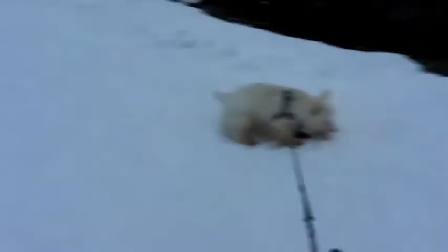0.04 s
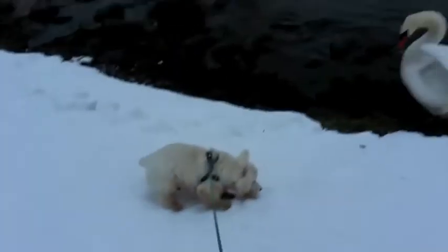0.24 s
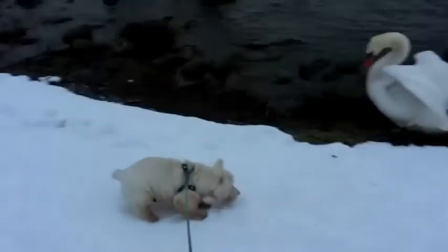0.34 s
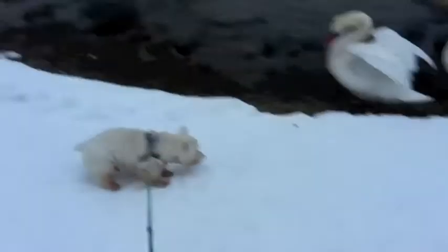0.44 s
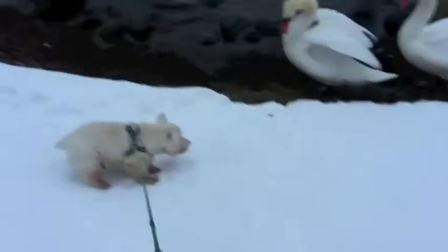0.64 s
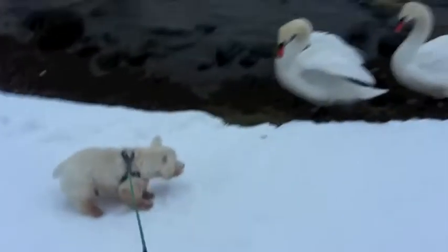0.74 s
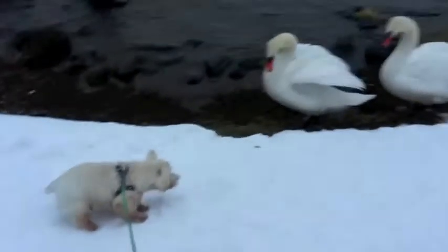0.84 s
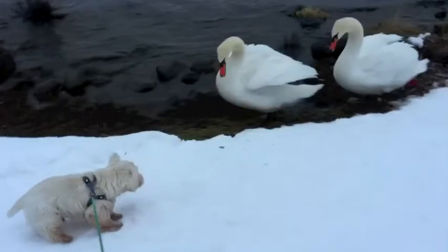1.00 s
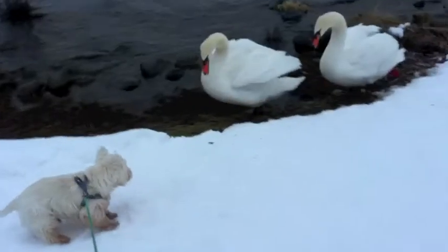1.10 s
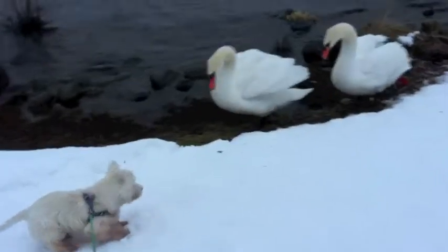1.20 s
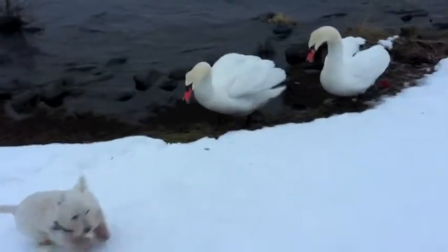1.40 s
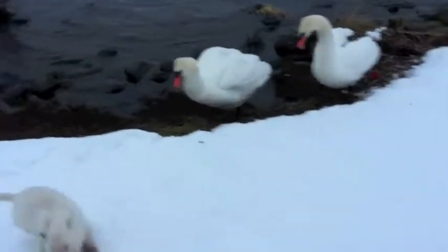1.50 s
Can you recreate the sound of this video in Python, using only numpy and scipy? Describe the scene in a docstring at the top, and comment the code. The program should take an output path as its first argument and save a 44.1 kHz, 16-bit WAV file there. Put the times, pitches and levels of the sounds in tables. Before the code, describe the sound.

Close footsteps in snow, outdoors beside a faintly washing river. The first lands with muffled thumps as a swan-like hiss briefly rises and dies away; the second is softer, crackling and creaking, with clothing rustle and one bright tick.

```python
"""Dull slips of snow packing under a boot sound close by, over the faint wash of a river.
Among them a short hiss, probably a swan's, swells and fades: turbulent air with moving resonances.
After a lull comes a lighter step: the crust fractures in crackles, the snow creaks under the load
and clothing swishes by friction. One sharp tick may be the clip of a small dog's lead."""
import sys
import numpy as np
from scipy import signal
from scipy.fft import rfft, irfft
from scipy.io import wavfile
from scipy.ndimage import map_coordinates

SR = 44100
rng = np.random.default_rng(int(sys.argv[2]) if len(sys.argv) > 2 else 0)


def int16_out(signal):
    """Quantize to a 16-bit WAV file."""
    q = np.round(np.clip(np.atleast_2d(signal).T, -1, 1) * 32767)
    wavfile.write(sys.argv[1], SR, q.astype(np.int16))


N = 68355
T = np.arange(N) / SR

# wash of the river (time [s], level [dB]) and its spectrum (frequency [Hz], gain [dB])
RIVER_LEVEL = [(0, -57), (.3, -61), (.8, -62.5), (1.55, -60.5)]
RIVER_SPECTRUM = [(30, -13), (70, -16), (150, -3.5), (400, -5.5), (800, -5), (2200, -8.5), (4200, -16),
                  (7000, -17), (10000, -19), (16000, -23)]
# swish of clothing (time [s], level [dB])
SWISH_LEVEL = [(.86, -70.5), (.93, -65.5), (1.0, -67), (1.12, -62), (1.4, -57), (1.55, -50)]
# its resonances (frequency [Hz], width [Hz], gain [dB]) and their glide (time [s], pitch [ratio])
CLOTH_RESONANCES = [(3050, 590, -1), (6600, 570, -4), (10000, 1700, -13.5)]
CLOTH_GLIDE = [(1.15, 0.91), (1.43, 1.08), (1.55, .99)]
# crunch of each step, and of weight settling on the second (time [s], level [dB])
FIRST_STEP_LEVEL = [(.336, -82), (.340, -43), (.352, -53), (.395, -46), (.435, -59), (.49, -51), (.55, -61),
                    (.605, -50), (.635, -71), (.72, -67.5)]
SECOND_STEP_LEVEL = [(.908, -84), (.917, -51.5), (.96, -57.5), (1.06, -55), (1.11, -50), (1.25, -57.5),
                     (1.345, -50.5), (1.405, -55), (1.55, -49)]
SETTLING_LEVEL = [(1.2, -66.5), (1.29, -55), (1.39, -56), (1.41, -62), (1.47, -49.5), (1.55, -61.5)]
# spectra of these three (frequency [Hz], gain [dB])
FIRST_STEP_SPECTRUM = [(250, -21), (500, 7), (950, 7.5), (2300, -1), (3100, -13.5), (5300, -4.5),
                       (8000, -16.5), (16000, -16)]
SECOND_STEP_SPECTRUM = [(240, 1.5), (320, -0.5), (750, -1.5), (1200, -1), (1900, -8.5), (3200, -10),
                        (4400, -17), (8000, -23.5), (16000, -40)]
SETTLING_SPECTRUM = [(200, -9), (450, -2.5), (620, 1), (900, -10.5), (2000, -29.5)]
# tone of the settling snow (time [s], frequency [Hz])
CREAK_PITCH = [(1.27, 330), (1.39, 466.4), (1.47, 506.5), (1.55, 565)]
# single cracks of the crust (time [s], peak [dB], frequency [Hz], decay [s])
CRUST_CRACKS = [(0.3381, -39, 4370, .0014), (0.914, -40, 824, 0.003), (0.941, -42, 5513, 0.0012),
                (0.9816, -38.5, 1650, 0.002), (1.046, -41.5, 1360, 0.0024), (1.0806, -34, 1310, 0.0018),
                (1.108, -42.5, 1270, 0.0061), (1.2, -43, 1620, 0.0024), (1.343, -41, 1320, 0.0043),
                (1.455, -43.5, 1480, 0.00098)]
# hollow knocks in the crust (time [s], peak [dB], frequency [Hz])
CRUST_KNOCKS = [(.6685, -40, 713), (1.082, -42.5, 303), (1.320, -40.5, 385), (1.382, -46, 483),
                (1.458, -37, 546)]
# bright rush of the hiss (time [s], level [dB]) and its spectrum (frequency [Hz], gain [dB])
RUSH_LEVEL = [(.33, -78), (.39, -61), (.435, -52.5), (.472, -42.5), (.515, -40.5), (.545, -56), (.62, -56),
              (.76, -67)]
RUSH_SPECTRUM = [(710, -35), (1200, -19), (1500, -5.5), (2380, -2.5), (3360, -3.5), (3780, 2.5), (4200, -2),
                 (5800, -4.5), (8170, -8), (9210, -16), (12500, -11.5), (16000, -28)]
# hollow part of the hiss (time [s], level [dB]) and the throat's glide (time [s], pitch [ratio])
HOLLOW_LEVEL = [(.35, -59.5), (.395, -49), (.435, -53.5), (.485, -53), (.53, -43.5), (.595, -48.5),
                (.622, -57), (.73, -58), (.79, -66.5), (.86, -74)]
THROAT_GLIDE = [(.36, .78), (.41, .94), (.45, 1.07), (.525, .92), (.59, .96), (.68, 1.04)]
# its gliding and its steady resonances (frequency [Hz], width [Hz], gain [dB])
THROAT_RESONANCES = [(1990, 300, -2.5), (2646, 370, 3), (4010, 190, -3.5), (4700, 300, -3.5)]
SIBILANCE, SIBILANCE_DB = [(7050, 180, 0), (11100, 1600, -13.5)], -14
# snow giving way under the boot (time [s], peak before the bass cut [dB], frequency [Hz])
SNOW_SLIPS = [(0.071, -44.5, 125), (.167, -46, 170), (0.2315, -32, 222), (0.245, -32, 167),
              (.257, -32, 189), (0.2679, -33.5, 318), (0.283, -30, 182), (0.322, -32.5, 167),
              (0.385, -28, 218), (0.393, -29.5, 180), (0.403, -27, 338), (.460, -35, 220),
              (0.4707, -15, 190), (0.487, -27, 240), (0.488, -34.5, 620), (.546, -24.5, 237),
              (0.5638, -22, 282), (.570, -28, 213), (.579, -28.5, 201), (0.5829, -21, 434),
              (.603, -28, 230), (0.655, -34.5, 182), (.670, -27.5, 227), (0.681, -36, 161),
              (.709, -36, 244), (1.002, -46, 179), (1.308, -46, 135)]
# rumble of smaller slips (time [s], level [dB]) and its spectrum (frequency [Hz], gain [dB])
RUMBLE_LEVEL = [(0, -62.5), (.115, -66.5), (.165, -52.5), (.205, -56.5), (.24, -49.5), (.41, -44),
                (.445, -46.5), (.48, -28), (.525, -40.5), (.6, -38.5), (.632, -53.5), (.69, -50.5),
                (.745, -67.5), (.87, -68), (.97, -54.5), (1.04, -71), (1.23, -65.5), (1.3, -55),
                (1.55, -55)]
RUMBLE_SPECTRUM = [(25, -24.5), (60, -22.5), (95, -8), (130, 3), (210, -1), (330, -10), (550, -15.5),
                   (900, -27), (2000, -61)]


def from_db(db):
    """Amplitude grows tenfold for every 20 dB."""
    return 10 ** (np.asarray(db) / 20)


def rms_one(x):
    """Normalisation to unit rms."""
    return x / np.sqrt(np.mean(x ** 2) + 1e-20)


def level(rows):
    """Amplitude envelope, interpolated in decibels and silent outside its span."""
    return from_db(np.interp(T, *np.transpose(rows), left=-140, right=-140))


def coloured(x, spectrum):
    """Spectral shaping, falling 12 dB per octave below the lowest point; unit rms."""
    hz, db = np.transpose(spectrum)
    f = np.maximum(np.arange(N // 2 + 1) * SR / N, 1)
    gain = from_db(np.interp(np.log(f), np.log(hz), db)) * np.minimum(f / hz[0], 1) ** 2
    return rms_one(irfft(rfft(x) * gain, N))


def resonate(x, hz, width_hz):
    """A damped two-pole resonator with unit peak gain."""
    r = np.exp(-np.pi * width_hz / SR)
    feedback = [1, -2 * r * np.cos(2 * np.pi * hz / SR), r * r]
    return signal.lfilter(np.array([1, 0, -1]) * (1 - r * r) / 2, feedback, x)


def cut(x, hz, kind, order=2):
    """Maximally flat low- or high-pass filtering."""
    return signal.sosfilt(signal.butter(order, hz, kind, fs=SR, output="sos"), x)


def resonant_noise(resonances):
    """Random excitation of parallel resonators; unit rms."""
    bands = (from_db(db) * resonate(rng.standard_normal(N), hz, width) for hz, width, db in resonances)
    return rms_one(sum(bands))


def glide(x, pitch_curve):
    """Resampling at a changing rate scales all frequencies by the same ratio."""
    ratio = np.interp(T, *np.transpose(pitch_curve))
    return map_coordinates(x, [np.cumsum(ratio)], order=3, mode="wrap")


def add(out, s, db, sound):
    """Superposition of a transient at a given time and peak level."""
    i = int(s * SR)
    out[i:i + len(sound)] += (from_db(db) * sound / np.abs(sound).max())[:N - i]


def river():
    """Flowing water radiates broadband noise, heard as a faint wash."""
    return level(RIVER_LEVEL) * coloured(rng.standard_normal(N), RIVER_SPECTRUM)


def clothing():
    """Friction of cloth on cloth excites resonances that rise and fall with the stride."""
    return level(SWISH_LEVEL) * glide(resonant_noise(CLOTH_RESONANCES), CLOTH_GLIDE)


def creak(waver_hz=71, jitter=0.046):
    """Settling snow gives a tone that rises under load and wavers by random frequency modulation."""
    waver = rms_one(cut(rng.standard_normal(N), waver_hz, "low"))
    hz = np.interp(T, *np.transpose(CREAK_PITCH)) * (1 + jitter * waver)
    return level(SETTLING_LEVEL) * np.sin(2 * np.pi * np.cumsum(hz) / SR)


def tick(low_hz=4140, high_hz=11800):
    """A band-limited impulse makes one bright tick, perhaps the clip of the lead."""
    out = np.zeros(N)
    add(out, s=1.3142, db=-20.5, sound=cut(signal.unit_impulse(SR // 100), low_hz, "high"))
    return cut(out, high_hz, "low", order=1)  # rounds off and lowers the peak


def grains(rate_per_s=1600, spread_db=3.5, rub_db=-4.5):
    """Snow crystals break independently: shot noise of uneven impulses over a smooth rub."""
    sizes = from_db(spread_db * np.minimum(rng.exponential(1, N), 4)) * rng.choice([-1, 1], N)
    breaks = rng.random(N) < rate_per_s / SR
    return rms_one(sizes * breaks) + from_db(rub_db) * rng.standard_normal(N)


def crunching_snow(width_times_decay=1.7, knock_s=0.0018):
    """Brittle fracture gives grains, knocks and cracks; the briefer a crack, the wider its band."""
    out = level(FIRST_STEP_LEVEL) * coloured(grains(), FIRST_STEP_SPECTRUM)
    out += level(SECOND_STEP_LEVEL) * coloured(grains(), SECOND_STEP_SPECTRUM)
    out += level(SETTLING_LEVEL) * coloured(grains(), SETTLING_SPECTRUM)
    t = T[:SR // 20]
    for s, db, hz, decay_s in CRUST_CRACKS:
        burst = rng.standard_normal(len(t)) * np.exp(-t / decay_s)
        crack = resonate(burst, hz, width_times_decay / decay_s)
        add(out, s, db, cut(crack, 2 * hz, "low"))
    for s, db, hz in CRUST_KNOCKS:
        add(out, s, db, t * np.exp(-t / knock_s) * np.sin(2 * np.pi * hz * t))
    return out


def hiss(flutter_db=1.5, flutter_hz=120, throat_low_hz=1700):
    """Turbulent air makes a bright, fluttering rush; throat resonances give it a hollow tail."""
    flutter = from_db(flutter_db * rms_one(cut(rng.standard_normal(N), flutter_hz, "low")))
    rush = level(RUSH_LEVEL) * coloured(rng.standard_normal(N), RUSH_SPECTRUM)
    throat = glide(cut(resonant_noise(THROAT_RESONANCES), throat_low_hz, "high"), THROAT_GLIDE)
    sibilance = from_db(SIBILANCE_DB) * resonant_noise(SIBILANCE)
    return flutter * (rush + level(HOLLOW_LEVEL) * (throat + sibilance))


def packing_snow(swell_cycles=0.34, bass_cut_hz=100):
    """Compressed snow yields in slips, pulses of about two cycles, over a rumble of smaller ones."""
    slips = np.zeros(N)
    t = np.arange(-SR // 50, SR // 50) / SR
    for s, db, hz in SNOW_SLIPS:
        pulse = np.sin(2 * np.pi * hz * t) / np.cosh(hz * t / swell_cycles)
        add(slips, s + t[0], db, pulse)  # centred on its time
    rumble = level(RUMBLE_LEVEL) * coloured(rng.standard_normal(N), RUMBLE_SPECTRUM)
    return cut(slips, bass_cut_hz, "high", order=3) + rumble


def scene():
    """Snow absorbs sound, so the sources add in one channel without echo."""
    return (packing_snow() + hiss() + crunching_snow() + tick() + creak() + clothing() + river())[None]


def record(dry, cutoff_hz=15900):
    """Band limiting: a steep elliptic low-pass removes the highest treble."""
    return signal.sosfilt(signal.ellip(10, .2, 70, cutoff_hz, fs=SR, output="sos"), dry)


dry = scene()
out = record(dry)
int16_out(out)
```